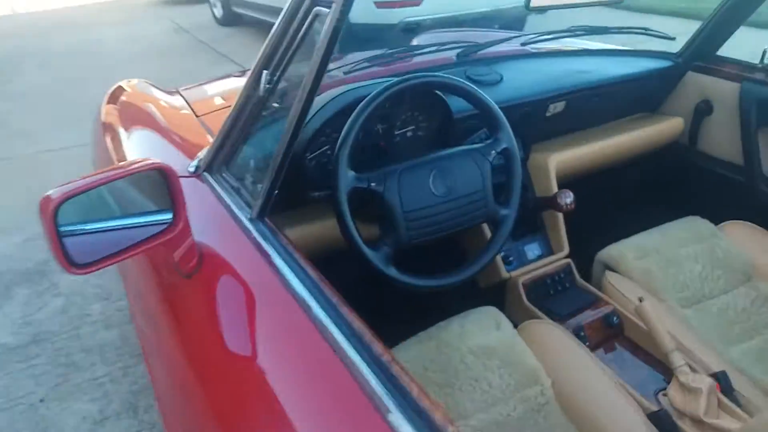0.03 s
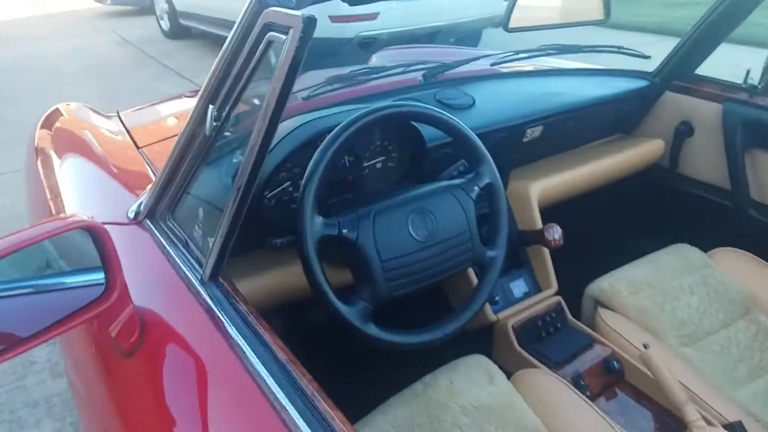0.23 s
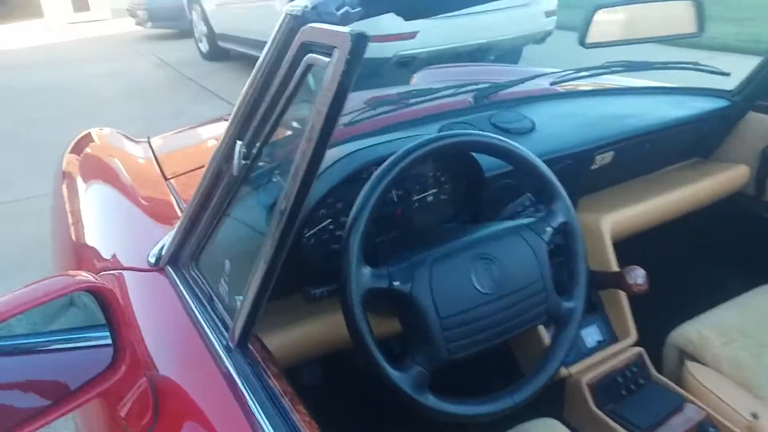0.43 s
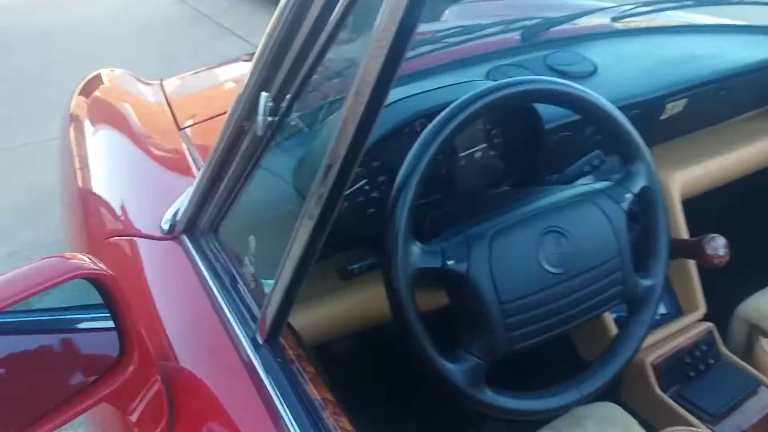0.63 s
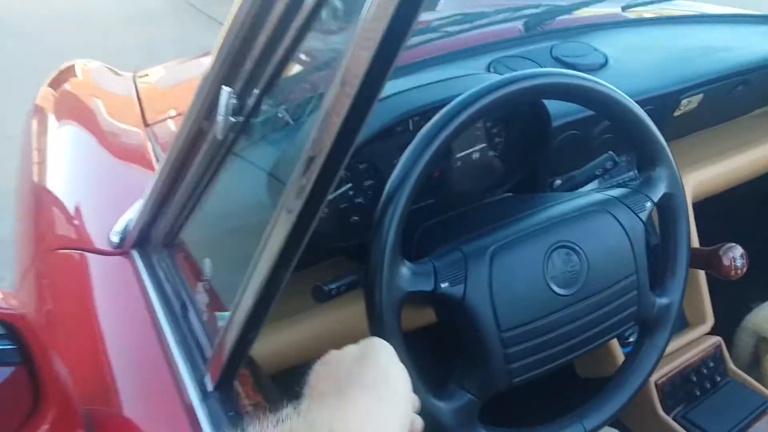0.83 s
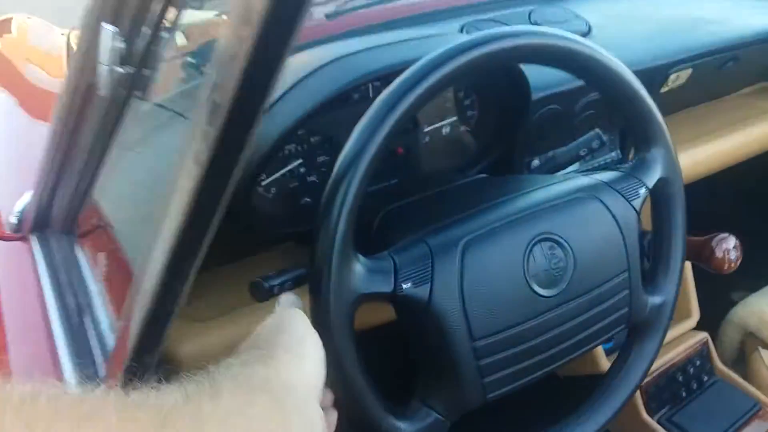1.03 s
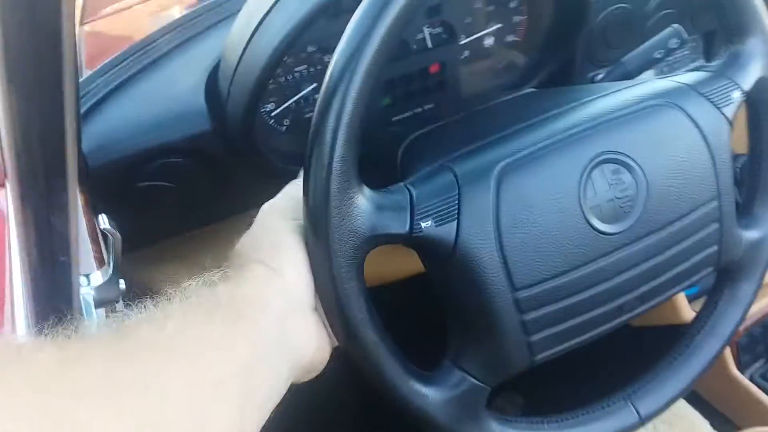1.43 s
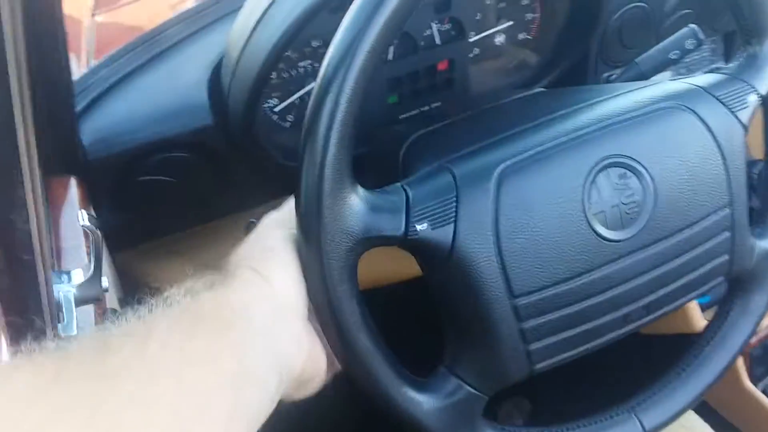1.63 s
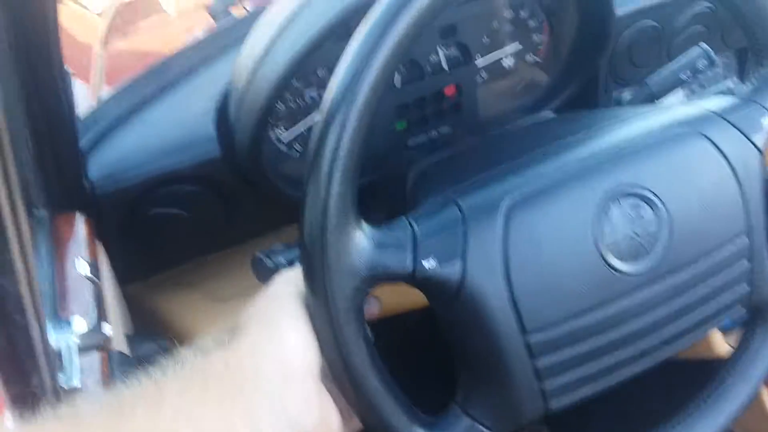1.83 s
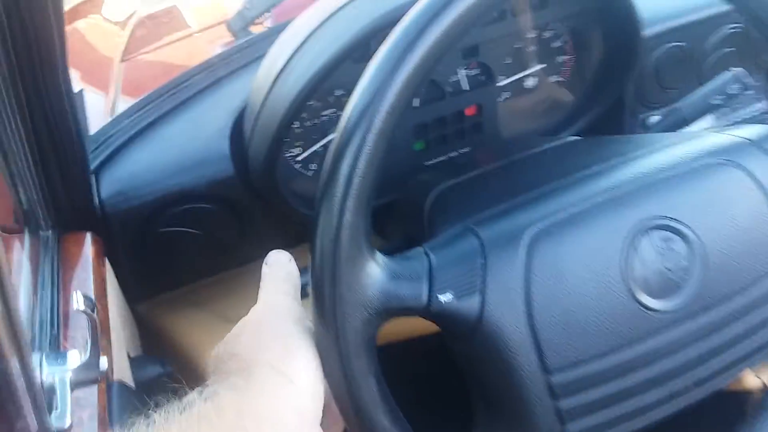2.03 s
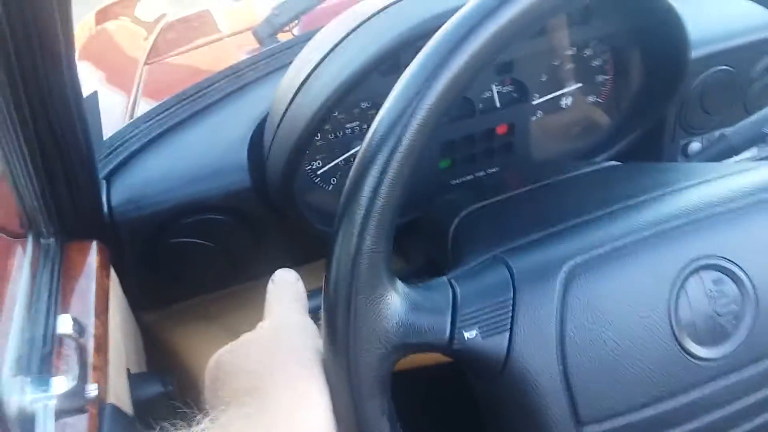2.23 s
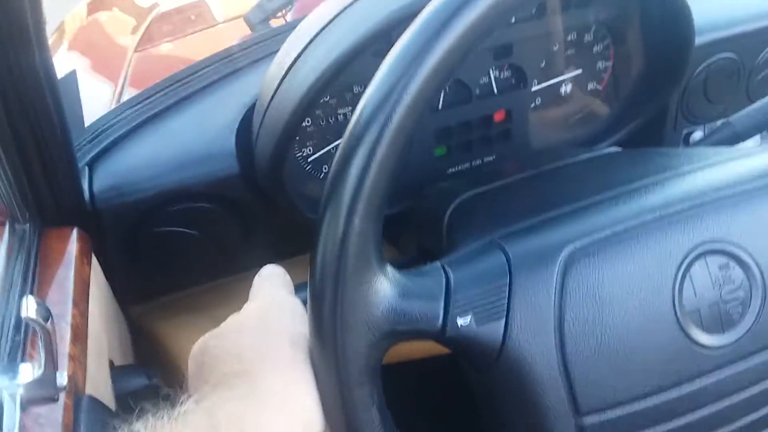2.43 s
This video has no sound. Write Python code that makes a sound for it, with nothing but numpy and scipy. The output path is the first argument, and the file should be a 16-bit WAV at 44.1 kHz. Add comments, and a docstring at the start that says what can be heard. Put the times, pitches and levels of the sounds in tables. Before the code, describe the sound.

One sharp click from a plastic steering column switch sounds inside a convertible, after wind has thumped on the microphone and eased into light puffs, mainly on the left. An engine idles faintly under steady outdoor hiss.

```python
"""At an open car, someone leans in and snaps a switch on the steering column: one sharp plastic click
and a softer second contact, each an impact that rings the column's shroud and echoes briefly in the cabin.
A turbulent gust buffets both microphone ports, then the cabin shelters the right one and eddies reach
mainly the left. An engine idles low in the background, under a steady outdoor hiss."""
import sys
import numpy as np
from scipy import signal
from scipy.fft import rfft, irfft, next_fast_len
from scipy.io import wavfile
from scipy.ndimage import uniform_filter1d, map_coordinates

SR = 44100
rng = np.random.default_rng(int(sys.argv[2]) if len(sys.argv) > 2 else 0)


def dump(signal):
    """Clip the signal to [-1, 1] and save it as 16-bit WAV at the path in sys.argv[1]."""
    limited = np.clip(np.atleast_2d(signal).T, -1, 1)
    pcm = np.round(limited * 32767).astype(np.int16)
    wavfile.write(sys.argv[1], SR, pcm)


N = 110250
TIME_S = np.arange(N) / SR

# Likeness of the outdoor sound at the two ports: frequency_hz, correlation
OUTDOOR_CORRELATION = [(60, 0.5), (640, 0.71), (1400, -0.49), (4000, 0.29)]


def amp(db):
    """Decibels to amplitude ratio."""
    return 10 ** (np.asarray(db) / 20)


def unit(x):
    """Each channel scaled to rms 1."""
    return x / np.sqrt(np.mean(x ** 2, axis=-1, keepdims=True) + 1e-20)


def along(points, hz):
    """Interpolation on a logarithmic frequency axis."""
    point_hz, values = np.transpose(points)
    return np.interp(np.log(hz + 1), np.log(point_hz + 1), values)


def curve(points):
    """Linear interpolation in time, one value per sample."""
    return np.interp(TIME_S, *np.transpose(points))


def wobble(knots_per_s):
    """A smooth fluctuation: a spline through random knots."""
    return map_coordinates(rng.standard_normal(N // 10), [TIME_S * knots_per_s])


def filtered(x, response):
    """Linear filtering: the spectrum times a frequency response."""
    size = next_fast_len(N + SR // 2)
    return irfft(rfft(x, size) * response(np.fft.rfftfreq(size, 1 / SR)), size)[..., :N]


def noise(spectrum):
    """Coloured noise of rms 1, uncorrelated between the channels."""
    return unit(filtered(rng.standard_normal((2, N)), lambda hz: amp(along(spectrum, hz))))


def even(x, samples):
    """Division by the running rms levels out chance swells."""
    return x / np.sqrt(np.abs(uniform_filter1d(x ** 2, samples, axis=-1)) + 1e-6)


def paired(x, correlation):
    """Mid-side mixing sets the left-right correlation, given as a number or a table over frequency."""
    def weights(hz):
        alike = np.full(hz.shape, correlation) if np.isscalar(correlation) else along(correlation, hz)
        angle = np.arccos(np.clip(alike, -1, 1)) / 2
        return np.array([np.cos(angle), np.sin(angle)])
    mid, side = filtered(x, weights)
    return unit(np.array([mid + side, mid - side]))


def patchy(x, depth_db):
    """Random gain over patches of time and frequency makes the colour of a noise drift."""
    spectrogram = signal.stft(x, nperseg=1024)[2]
    field = uniform_filter1d(rng.standard_normal(spectrogram.shape[1:]), size=4, axis=0)
    field = uniform_filter1d(field, size=12, axis=1)
    return unit(signal.istft(spectrogram * amp(depth_db * field / field.std()))[1][:, :N])


def fade(t, attack_s, t60_s):
    """A quick rise, then exponential damping by 60 dB in t60_s."""
    return (1 - np.exp(-t / attack_s)) * np.exp(-np.log(1000) * t / t60_s)


def microphone_hiss():
    """Self-noise: a steady hiss, independent in each channel."""
    spectrum = [(4500, -6), (6400, 2), (7600, 9), (8700, -11), (10300, -1), (12300, 6), (15700, 1.5)]  # frequency_hz, density_db
    return amp(-56.5) * noise(spectrum)


def outdoors():
    """A partly coherent ambient field: a steady distant rumble and a slowly swelling wash."""
    rumble_spectrum = [(25, -11), (80, 2.5), (160, -7.5), (750, -19), (1100, -14), (6000, -59.5)]  # frequency_hz, density_db
    wash_spectrum = [(600, -10), (1100, 2), (1600, 1), (2100, 2), (2700, 1), (3400, -5), (4300, -8.5),
                     (5500, -16.5), (12000, -24.5)]  # frequency_hz, density_db
    wash_swell = [(0, -43), (.6, -45.5), (1.5, -48.5), (1.78, -47), (1.95, -43), (2.25, -44.5),
                  (2.5, -48.5)]  # time_s, level_db
    pan = amp([[-0.83], [0.83]])  # slightly to the right
    wash = patchy(paired(noise(wash_spectrum), OUTDOOR_CORRELATION), depth_db=3.0)
    rumble = paired(noise(rumble_spectrum), OUTDOOR_CORRELATION)
    return amp(curve(wash_swell)) * pan * wash + amp(-42.5) * rumble


def idling_engine(firing_hz=53.36, drift=0.0077):
    """Periodic firing gives a low tone whose pitch wavers with the engine's speed."""
    swell = [(0, -48), (1.45, -44.5), (2.0, -38.5), (2.5, -38.5)]  # time_s, level_db
    phase = 2 * np.pi * np.cumsum(firing_hz * (1 + drift * wobble(7.2))) / SR
    return amp(curve(swell)) * unit(np.sin(phase))


def wind(strong_db=-12, flutter_db=6, crackle_db=3.5):
    """Turbulent pressure at each port: light wind rumbles, stronger wind buffets and then rasps."""
    gust = [(0, -34.5), (.12, -32.5), (.19, -32), (.28, -31.5), (.41, -21.5), (.48, -24), (.54, -20),
            (.6, -26.5), (.65, -14.5), (.705, -14.5), (.745, -26.5), (.87, -34.5), (1.0, -41.5),
            (1.24, -34), (1.6, -43.5), (1.7, -26.5), (1.78, -38), (2.3, -46.5)]  # time_s, strength_db
    shelter = [(.65, -1), (1.0, -4), (1.35, -13.5), (2.5, -2.5)]  # the cabin's lee on the right port: time_s, gain_db
    rumble_spectrum = [(25, -35), (55, -8.5), (95, -3), (180, -9), (400, -22), (1500, -63)]  # frequency_hz, density_db
    buffet_spectrum = [(40, -32), (110, -3.5), (200, -0.5), (340, 4), (520, -2.5), (800, -14),
                       (1300, -27.5), (4000, -60)]  # frequency_hz, density_db
    rasp_spectrum = [(200, -3), (900, 4), (1500, -3), (2500, -6.5), (4000, -18), (12000, -58)]  # frequency_hz, density_db
    strength_db = curve(gust)
    force_db = np.array([strength_db, strength_db + curve(shelter)]) - strong_db
    flutter = np.array([wobble(70), wobble(70)])
    crackle = np.array([wobble(300), wobble(300)])
    lumps = amp(flutter_db * np.tanh(flutter))
    spurts = amp(0.41 * flutter_db * flutter + crackle_db * crackle)
    # With rising wind the rumble grows more slowly than the buffeting, the rasp faster.
    rumble = amp(-11.5 + 0.55 * force_db) * even(noise(rumble_spectrum), samples=3000)
    buffet = amp(force_db) * even(lumps * paired(noise(buffet_spectrum), 0.07), samples=3000)
    rasp = amp(-14.5 + 2.02 * force_db) * even(spurts * noise(rasp_spectrum), samples=3000)
    return amp(strong_db) * (rumble + buffet + rasp)


def eddies(rise_s=0.00087, rolloff_order=3.47):
    """Each vortex striking the ports is a pulse of band-limited noise that rises abruptly and dies."""
    puffs = [(.184, 0.01, -26.5, -21.5, 353), (.247, 0.007, -21.5, -31, 340),
             (0.32, 0.0038, -21.5, -21.5, 373), (0.391, 0.0068, -10.5, -18.5, 450),
             (.432, 0.0058, -22, -18.5, 400), (.450, 0.0028, -23, -31, 1150),
             (0.5346, 0.01, -15, -14.5, 600), (.584, 0.0037, -20, -18, 470),
             (.611, 0.0031, -11.5, -16.5, 450), (.643, 0.0049, -7.5, -20, 710),
             (.650, 0.0057, -10, -8.5, 560), (.687, 0.0044, -11, -22.5, 696),
             (.920, 0.0072, -16, -16.5, 342), (1.184, 0.0029, -26.5, -38, 656),
             (1.227, 0.012, -26, -41, 765), (1.267, 0.012, -21.5, -25.5, 410),
             (1.318, 0.0058, -32, -42, 770), (1.365, .004, -28, -43, 1000),
             (1.423, 0.0023, -28.5, -45, 730), (1.726, .002, -25, -43, 1110),
             (1.795, 0.0019, -28.5, -40, 950)]  # peak_s, decay_s, left_db, right_db, corner_hz
    out = np.zeros((2, N))
    for peak_s, decay_s, left_db, right_db, corner_hz in puffs:
        def band(hz):
            high_pass = hz ** 3 / np.hypot(hz ** 3, (0.51 * corner_hz) ** 3)
            return high_pass / np.hypot(1, (hz / corner_hz) ** rolloff_order)
        puff = even(filtered(rng.standard_normal((2, N)), band), samples=300)
        width_s = np.where(TIME_S < peak_s, rise_s, decay_s)
        envelope = np.exp(-.5 * ((TIME_S - peak_s) / width_s) ** 2)
        out += amp([[left_db], [right_db]]) * envelope * puff
    return out


def shroud_ring(t, t60_at_1khz_s=0.051, phase_scatter_rad=1):
    """Free vibration of the plastic switch and shroud: damped modes, the higher ones dying sooner."""
    modes = [(715, -1), (800, 2.5), (1078, 4), (1674, -4.5), (2630, -8), (3844, -16), (4237, -5.5),
             (4727, -14), (5319, -17), (7100, -7), (12270, -12)]  # pitch_hz, level_db
    out = np.zeros((2, N))
    for pitch_hz, level_db in modes:
        port_phases = phase_scatter_rad * rng.standard_normal((2, 1))
        envelope = fade(t, attack_s=0.00041, t60_s=t60_at_1khz_s * (pitch_hz / 1000) ** -.25)
        out += amp(level_db) * envelope * np.sin(2 * np.pi * pitch_hz * t + port_phases)
    return out


def cabin_reflections(t):
    """Reverberation in a small enclosure: dense reflections merge into a short noise tail."""
    spectrum = [(1000, 6.5), (2000, -3), (4300, -9), (6000, -21), (15000, -30)]  # frequency_hz, density_db
    return noise(spectrum) * fade(t, attack_s=0.0069, t60_s=0.19)


def switch(crossover_hz=4950, correlation=0.091, attack_s=0.00015):
    """Impact excitation: each contact snaps, knocks and rings the shroud, and the cabin answers."""
    # The hand finds the stalk, the switch snaps over in four contacts, the lever rebounds twice.
    contacts = [(1.3655, -45, -1, -9), (1.6465, -32, -12, 6), (1.6478, -21.5, -4, 0),
                (1.6495, -21.5, 2, -2), (1.6535, -31, -5, 2), (1.6836, -32.5, -7, -7),
                (1.6873, -29.5, -1, -24)]  # start_s, level_db, knock_db, treble_db
    snap_spectrum = [(1500, -24), (2500, -7), (4300, 0.5), (6200, -5), (7300, -1), (9000, -9), (12700, 2),
                     (15500, 3.5)]  # frequency_hz, density_db
    knock_spectrum = [(500, -13), (750, -4), (1150, 9.5), (1500, -30), (5000, -16)]  # frequency_hz, density_db
    low_pass = signal.butter(2, crossover_hz, fs=SR)
    high_pass = signal.butter(2, crossover_hz, "high", fs=SR)
    out = np.zeros((2, N))
    for start_s, level_db, knock_db, treble_db in contacts:
        t = np.maximum(TIME_S - start_s, 0)
        ring = shroud_ring(t)
        snap = paired(noise(snap_spectrum), correlation) * fade(t, attack_s, t60_s=0.032)
        knock = even(paired(noise(knock_spectrum), correlation), samples=200)
        knock *= fade(t, attack_s, t60_s=0.036)
        contact = snap + amp(knock_db) * knock + amp(-4.5) * ring + amp(-10.5) * cabin_reflections(t)
        body = signal.lfilter(*low_pass, contact)
        treble = signal.lfilter(*high_pass, contact)
        out += amp(level_db) * (body - amp(treble_db) * treble)  # the two bands are in antiphase
    return out


def scene():
    """Superposition of the switch, wind, engine and background noise."""
    return switch() + wind() + eddies() + idling_engine() + outdoors() + microphone_hiss()


def record(dry):
    """Soft saturation in the microphone rounds the strongest peaks; a band limit cuts the top treble."""
    overload, band_limit_hz = 0.52, 15850
    rounded = dry / (1 + np.abs(dry / overload) ** 4) ** (1 / 4)
    return filtered(rounded, lambda hz: hz < band_limit_hz)


dry = scene()
out = record(dry)
dump(out)
```